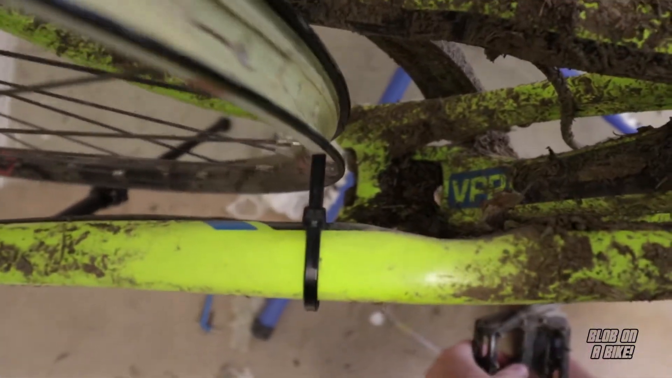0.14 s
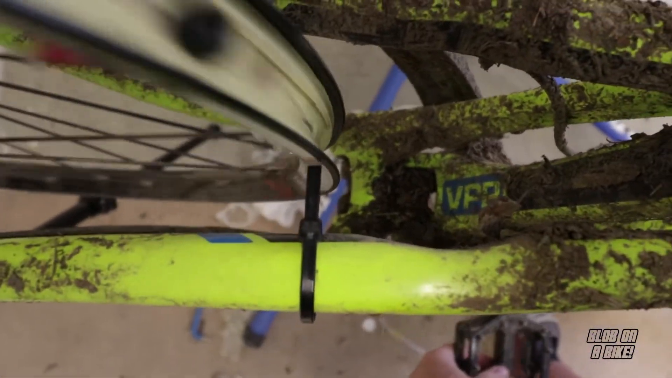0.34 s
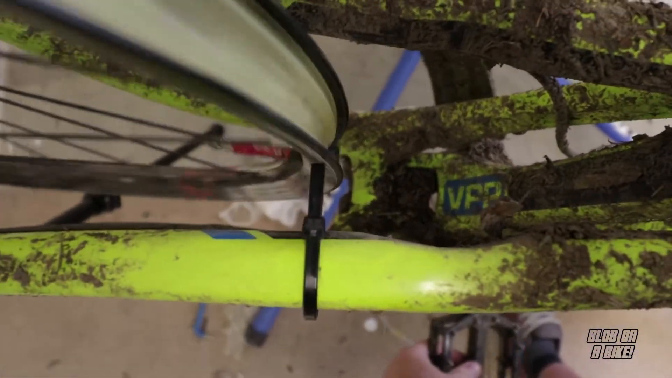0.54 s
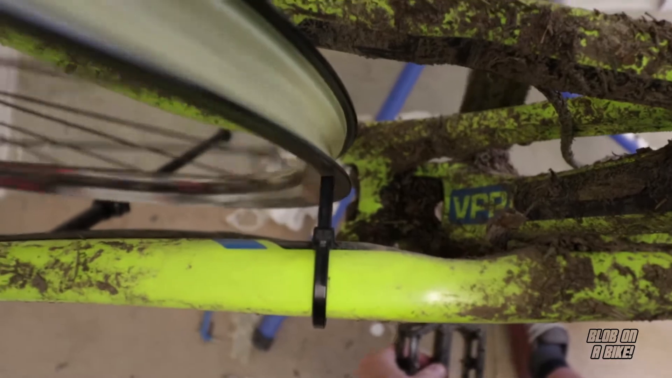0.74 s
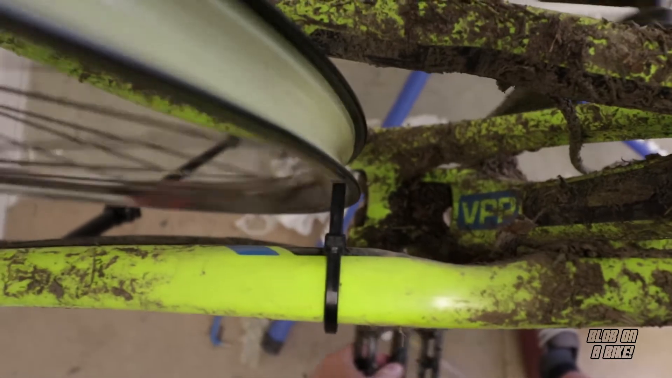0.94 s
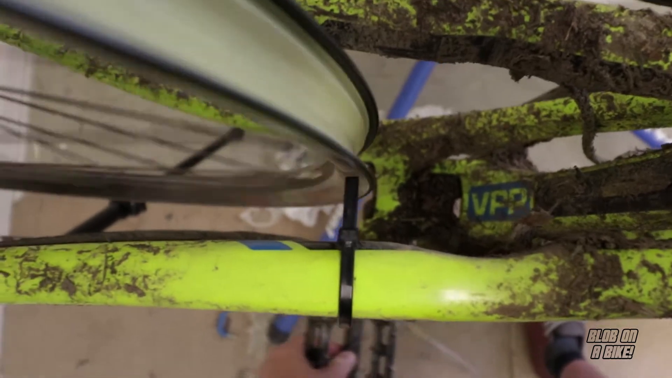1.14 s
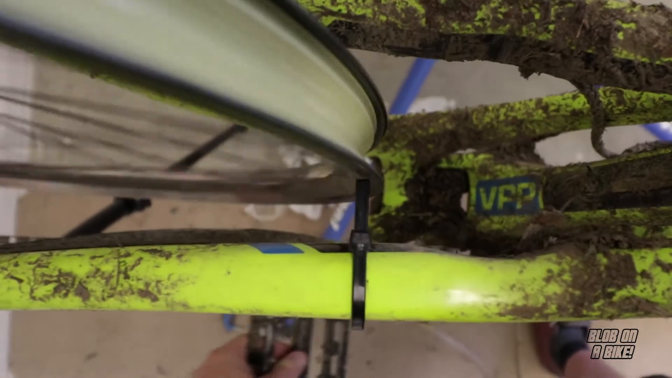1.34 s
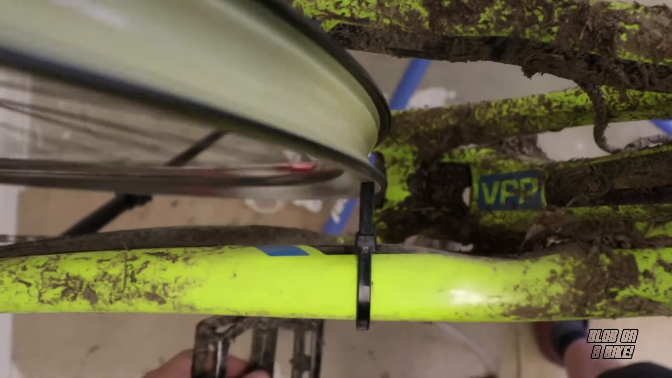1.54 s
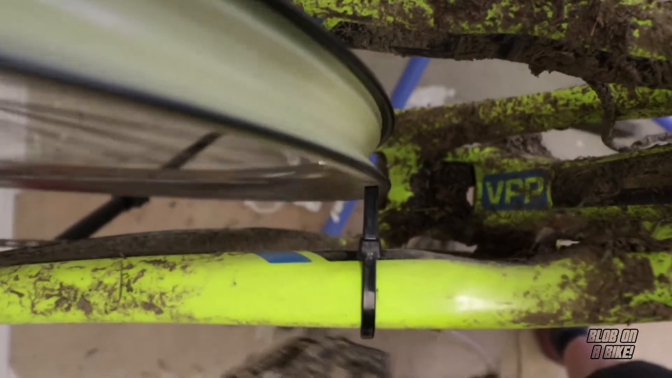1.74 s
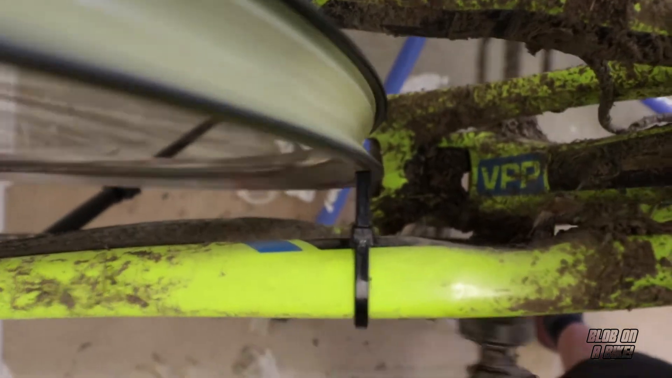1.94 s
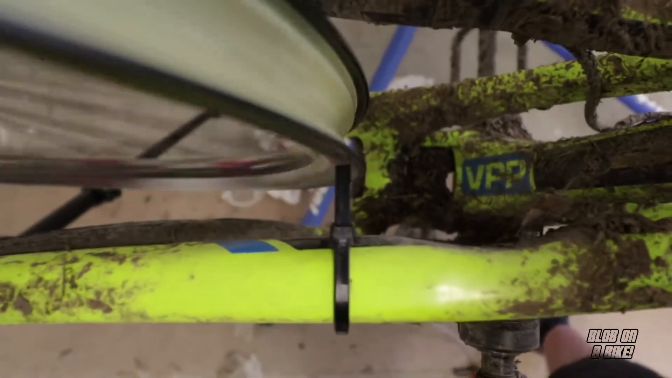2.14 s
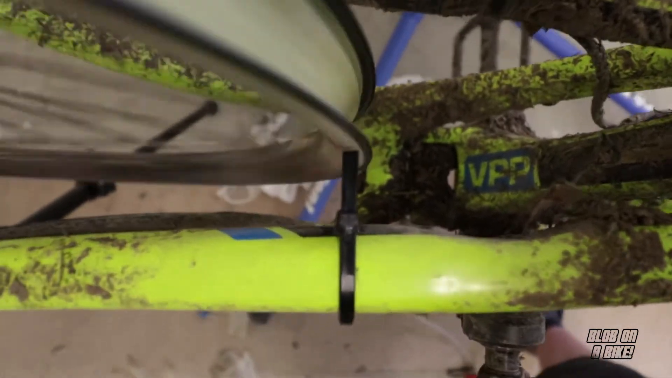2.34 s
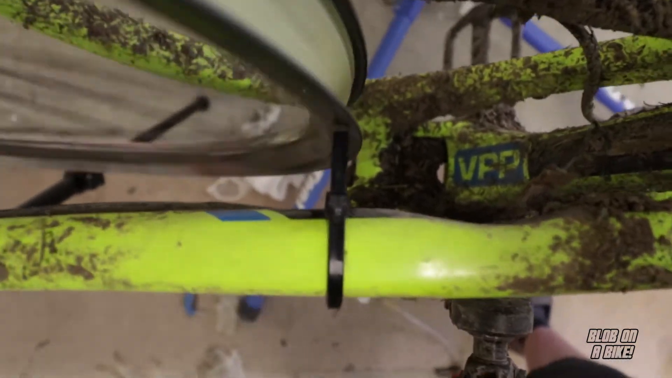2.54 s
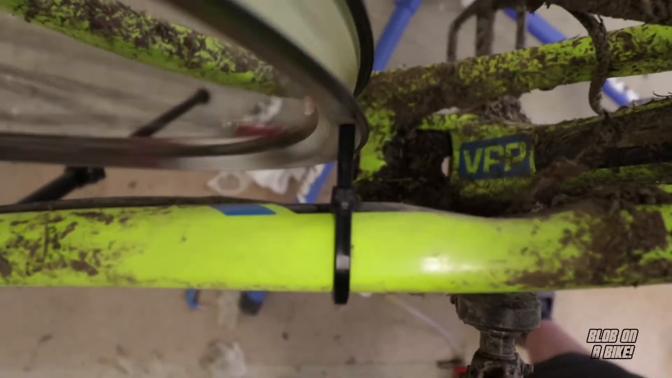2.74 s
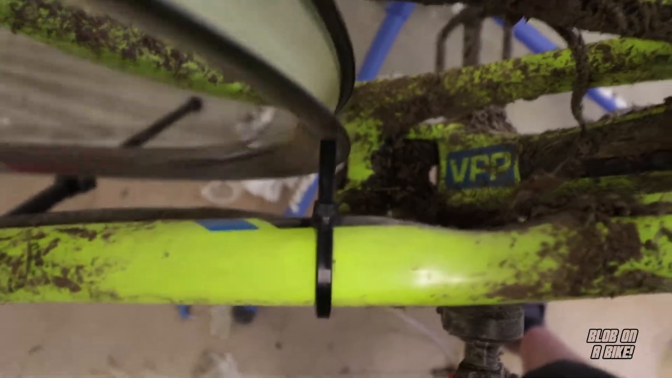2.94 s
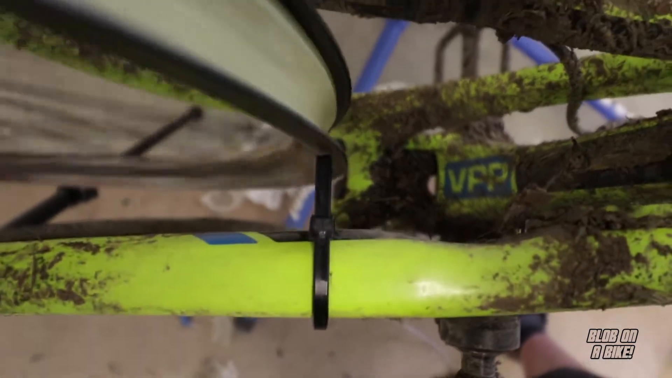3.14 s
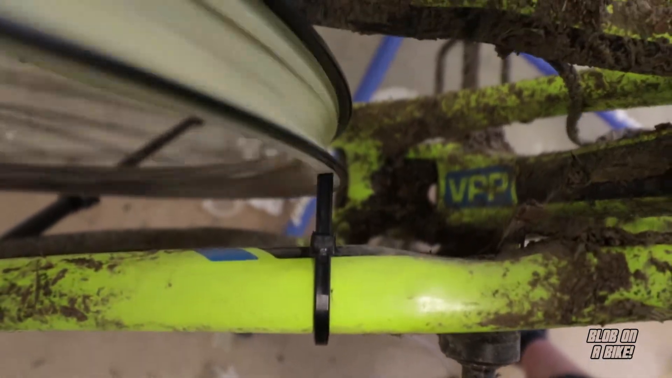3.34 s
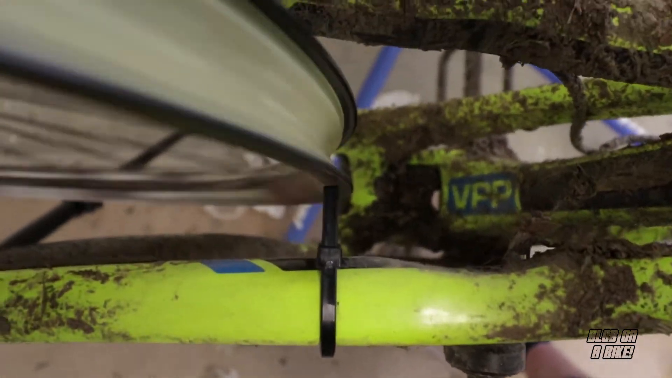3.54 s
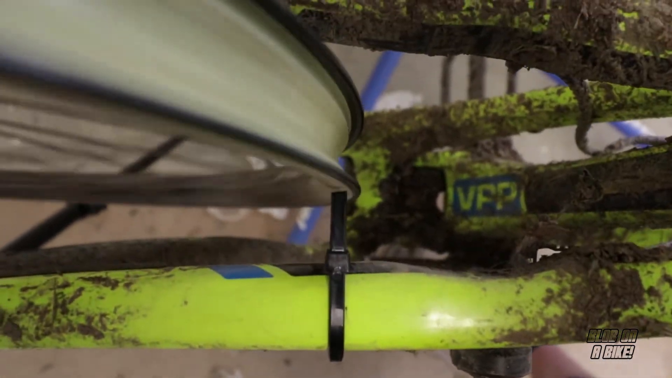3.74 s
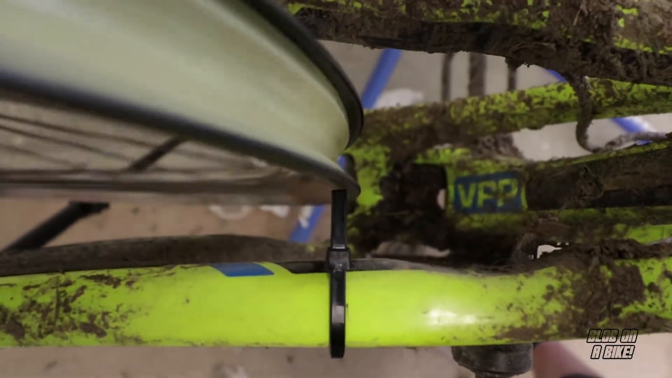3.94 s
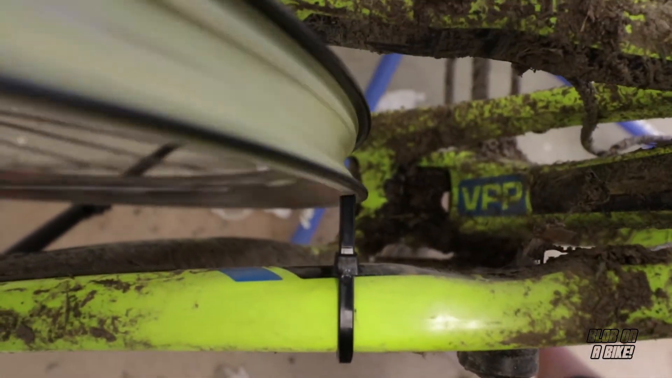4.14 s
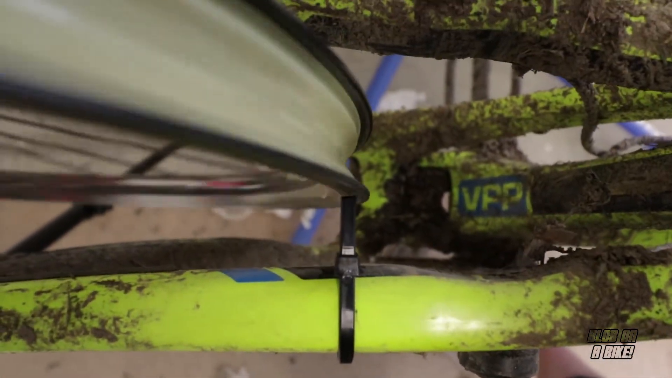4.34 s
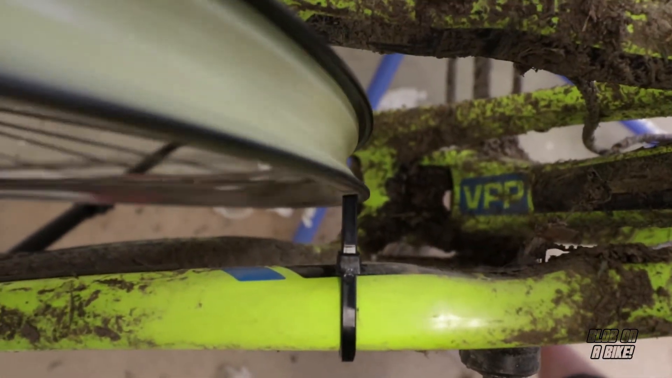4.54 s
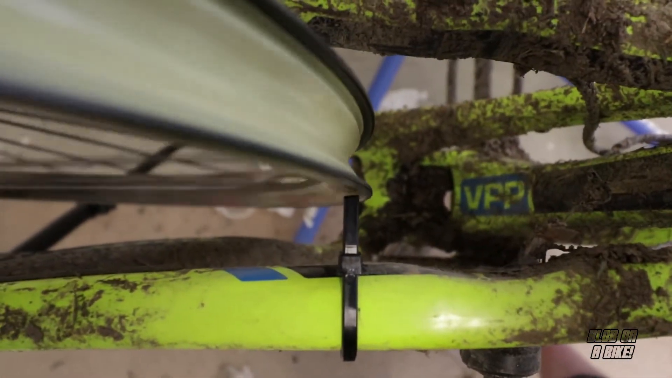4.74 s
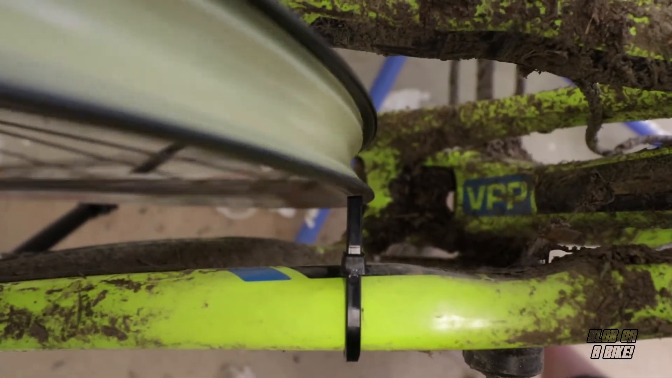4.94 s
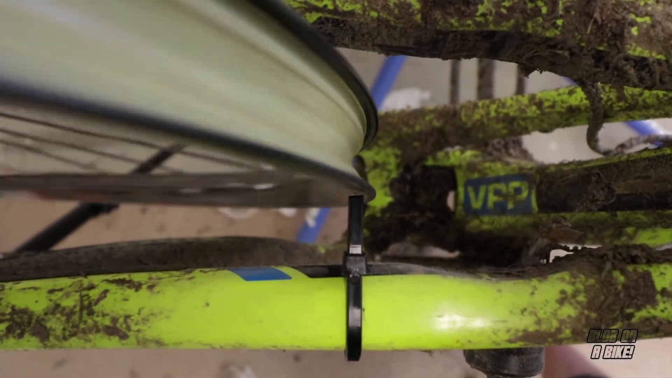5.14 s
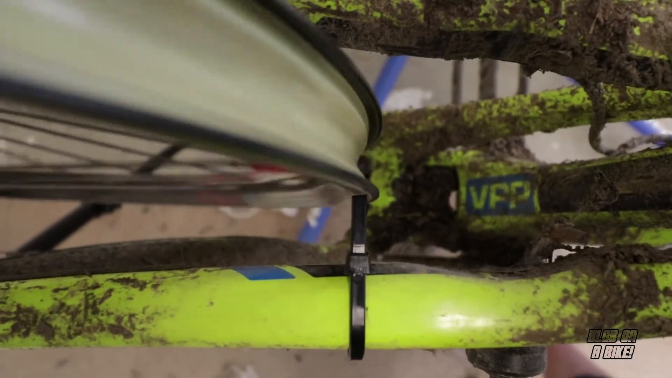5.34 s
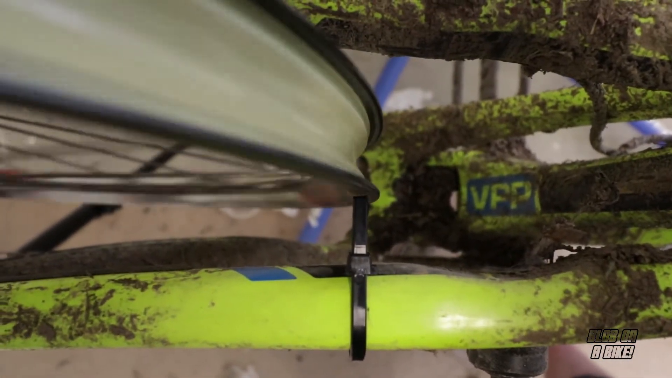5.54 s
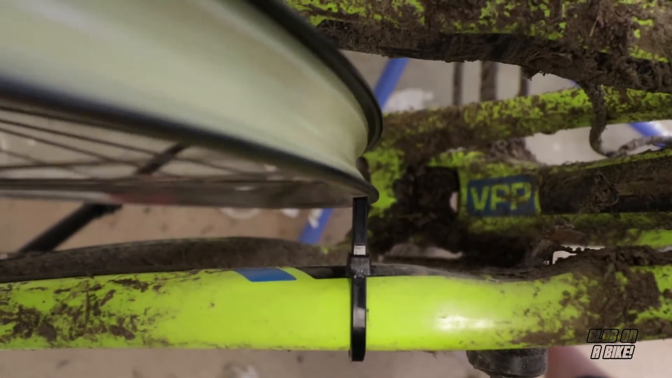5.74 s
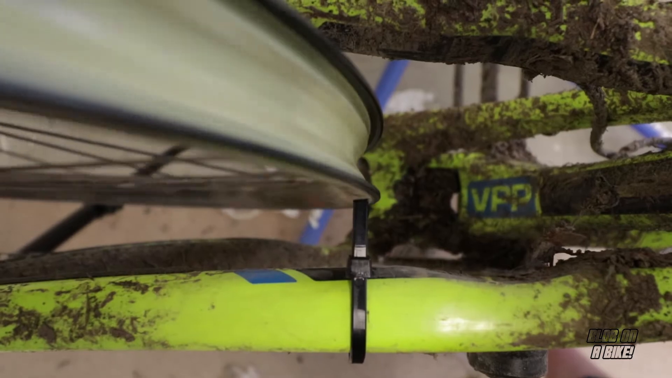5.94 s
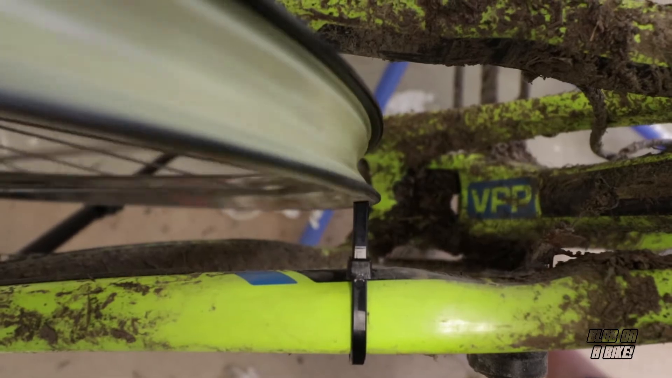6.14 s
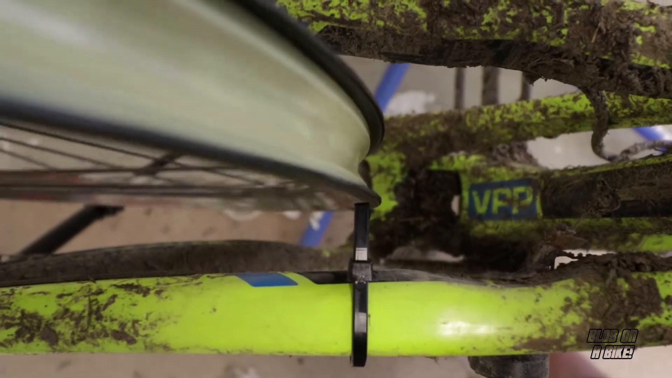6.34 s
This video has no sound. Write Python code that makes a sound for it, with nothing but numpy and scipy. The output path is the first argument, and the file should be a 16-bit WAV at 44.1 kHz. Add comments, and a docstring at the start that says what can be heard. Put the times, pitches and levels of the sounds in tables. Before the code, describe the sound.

Crank knocks and chain clinks, then a bicycle freewheel coasts with a loud bright ratchet buzz gradually slowing toward distinct clicks in a small workshop.

```python
"""A knock of a bicycle crank comes first, then more knocks, a few chain clinks and a soft chain rustle.
Then the crank is held and the wheel coasts on its stand: the freewheel pawls drop over the ratchet teeth,
a buzz that slowly thins into separate clicks. A motor hums in the small workshop throughout.
Knocks and clicks are sharp pushes or tiny noise bursts that make metal ring; the hum is a sum of sines.
It is heard in mono from beside the rear tyre."""
import sys
import numpy as np
from scipy import signal
from scipy.fft import rfft, irfft
from scipy.io import wavfile

SR = 44100
rng = np.random.default_rng(int(sys.argv[2]) if len(sys.argv) > 2 else 0)


def bounce(signal):
    """Save signal as a 16-bit WAV file at the path given by the first command-line argument."""
    frames = np.transpose(np.atleast_2d(signal))
    limited = np.clip(frames, -1, 1)
    pcm = np.round(limited * 32767).astype(np.int16)
    wavfile.write(sys.argv[1], SR, pcm)


N = 282240
TIME = np.arange(N) / SR
FREQ = np.maximum(np.fft.rfftfreq(16384, 1 / SR), 1)  # starts at 1 Hz so that logarithms work


def undb(db):
    """Turn decibels into a gain."""
    return 10 ** (np.asarray(db) / 20)


def unit(x):
    """Scale to an rms of 1."""
    return x / np.sqrt(np.mean(x ** 2))


def curve(rows, at):
    """Join rows of (x, value) by straight lines."""
    return np.interp(at, *np.transpose(rows))


def colour(points, freq=FREQ):
    """Gain curve through (frequency [Hz], level [dB]) points, straight on a log-frequency axis."""
    hz, db = np.transpose(points)
    return undb(np.interp(np.log(freq), np.log(hz), db))


def resonances(modes):
    """Gain curve with one peak for each (frequency [Hz], width [Hz], level [dB])."""
    power = 0
    for hz, width, db in modes:
        detuning = (FREQ ** 2 - hz ** 2) / (FREQ * width)
        power = power + undb(db) ** 2 / (1 + detuning ** 2)
    return np.sqrt(power)


def ring(x, gain):
    """Make a body with this gain curve ring: its response starts at the push and has unit energy."""
    # folding the cepstrum forward in time gives the minimum-phase response
    cepstrum = irfft(np.log(gain))
    half = len(cepstrum) // 2
    response = irfft(np.exp(rfft(2 * cepstrum[:half], 2 * half)))[:half]
    return signal.fftconvolve(x, response / np.linalg.norm(response))[:N]


def impulses(times, sizes):
    """One sharp push, a single sample long, at each time."""
    return np.bincount(np.maximum(times * SR, 0).astype(int), sizes, N)[:N]


def chatter(times, sizes, contact_s):
    """Each contact is a tiny, quickly dying noise burst of steel on steel."""
    decay = np.exp(-1 / (contact_s * SR))  # power kept from one sample to the next
    pushes = impulses(times, sizes ** 2) + 1e-18  # the tiny offset keeps the power above zero
    power = signal.lfilter([1 - decay], [1, -decay], pushes)
    return np.sqrt(power) * rng.standard_normal(N)


# How long the workshop's reverberation takes to fall by 60 dB: (frequency [Hz], decay time [s])
ROOM = [(200, 0.38), (2000, 0.49), (4500, 0.48), (9000, 0.3), (15000, 0.24)]


def tail(build_s=0.0033):
    """A random, diffuse echo of the workshop, of unit energy; each frequency dies at its own pace."""
    t = TIME[:SR // 2]
    spectrum = rfft(rng.standard_normal(len(t)))
    freq = np.fft.rfftfreq(len(t), 1 / SR)
    hz, decay_times = np.transpose(ROOM)
    echo = 0
    # overlapping bands share the spectrum between neighbouring frequencies of the table
    for band, decay_s in zip(np.eye(len(hz)), decay_times):
        echo = echo + irfft(spectrum * np.interp(freq, hz, band), len(t)) * undb(-60 * t / decay_s)
    echo = echo * (1 - np.exp(-(t / build_s) ** 2))  # the echo takes a moment to build up
    return echo / np.linalg.norm(echo)


def room(x, wet_db):
    """Add the workshop's reverberation to a source at rest."""
    return x + undb(wet_db) * signal.fftconvolve(x, tail())[:N]


def turning_room(x, angle, wet_db, count=3):
    """A turning source sweeps its lobes round the room, so the mix of echo paths keeps changing."""
    echoes = 0
    for k in range(1, count + 1):
        for wave in (np.cos, np.sin):
            echoes = echoes + signal.fftconvolve(x * wave(k * angle), tail())[:N]
    return x + undb(wet_db) * echoes / np.sqrt(count)


MOTOR_HZ = 30.44  # turns per second
# Hum of the motor: (multiple of the turning rate, rms level [dB])
HUM = [(3, -75), (4, -63.5), (5, -76.5), (8, -68), (9, -77), (10, -69.5), (12, -74.5), (13, -71), (14, -70),
       (15, -72.5), (29, -81.5), (32, -86), (35, -75), (36, -77), (38, -72), (39, -80), (40, -80),
       (41, -75), (42, -89), (47, -82), (53, -79.5)]
# Colour of the still air in the room: (frequency [Hz], relative level per Hz [dB])
AIR = [(25, -17), (42, -18), (60, -20), (80, -4), (118, -5.5), (176, -9.5), (300, -10.5), (420, -10),
       (600, -17.5), (850, -20), (1200, -18), (1650, -25), (1950, -32.5), (15000, -60)]


def workshop(air_db=-61):
    """A motor hums as steady sines at multiples of its turning rate, over the noise of still air."""
    hum = 0
    for k, db in HUM:
        turns = k * MOTOR_HZ * TIME + rng.random()
        hum = hum + undb(db) * np.sqrt(2) * np.sin(2 * np.pi * turns)
    return hum + undb(air_db) * ring(rng.standard_normal(N), colour(AIR))


# Soft low rubbing as the bike is handled: (time of the peak [s], length [s], centre [Hz], level [dB])
RUBS = [(1.65, 0.6, 185, -65), (5.25, 0.26, 232, -55)]


def rubs(width_hz=170):
    """Noise through one low, broad resonance swells and dies smoothly."""
    total = 0
    for s, length, hz, db in RUBS:
        swell = undb(db) * np.exp(-(2 * (TIME - s) / length) ** 2)
        # squaring makes the slopes steeper and the peak narrower
        total = total + swell * ring(rng.standard_normal(N), resonances([(hz, width_hz, 0)]) ** 2)
    return total


# The running chain, before the room is added: (time [s], level [dB])
CHAIN = [(.55, -84.5), (1.05, -72.5), (1.3, -74.5), (1.5, -66), (1.62, -74), (1.8, -67.5), (1.97, -72.5),
         (2.1, -90)]
# The chain settling on the sprockets: (time [s], level [dB])
CHAIN_CLINKS = [(.578, -42), (0.819, -37.5), (0.959, -28), (0.975, -34), (1.009, -30.5), (1.381, -37),
                (1.489, -36)]
# Colour of the oily links: (frequency [Hz], relative level [dB])
LINKS = [(300, -0.5), (600, -11), (1500, 0.5), (1950, -1), (2350, -4.5), (2850, 1), (3200, -2.5), (3750, 3),
         (4500, -7.5), (6000, -9.5), (8000, -13.5), (10500, -15), (15000, -19)]


def chain(count=2000, scatter_db=5.0, contact_s=.0016):
    """Many links tick faintly over the sprockets at random times, with a few clearer clinks."""
    end_s = CHAIN[-1][0]
    times = rng.uniform(0, end_s, count)
    sizes = unit(undb(scatter_db * rng.standard_normal(count)))
    # weigh the ticks so that the level does not depend on how many there are
    sizes = sizes * np.sqrt(end_s * SR / count)
    ticks = chatter(times, sizes * undb(curve(CHAIN, times)), contact_s)
    clink_times, clink_db = np.transpose(CHAIN_CLINKS)
    clinks = chatter(clink_times, undb(clink_db), contact_s=.003)
    return room(ring(ticks + clinks, colour(LINKS)), wet_db=-0.5)


# Knocks of crank and pedal: (time [s], level of the body [dB], metal tick relative to the body [dB])
KNOCKS = [(.008, -25.5, -13), (.11, -33, 15.5), (.703, -39, -10), (.736, -17.5, -19), (1.908, -24.5, -30)]
# What a knock's body rings with, before its colour: (frequency [Hz], width [Hz], level [dB])
KNOCK_MODES = [(606, 110, 0.5), (850, 260, -10), (1540, 250, -0.5), (2420, 120, 0.5), (3680, 92, -2)]
# What the metal tick rings with, before its colour: (frequency [Hz], width [Hz], level [dB])
TICK = [(1710, 260, -3.5), (2170, 210, 1.5), (2700, 300, -2), (3600, 280, 1), (4350, 700, -6),
        (10000, 3000, -40)]


def knocks():
    """Crank and pedal knock close by: each push makes a dull body and a metal tick ring."""
    times, db, tick_db = np.transpose(KNOCKS)
    body_colour = colour([(200, -10.5), (500, 22), (4000, 10), (12000, -18)])
    tick_colour = colour([(500, 3), (1600, -1), (11000, -10), (15000, -16)])
    body = ring(impulses(times, undb(db)), resonances(KNOCK_MODES) * body_colour)
    tick = ring(impulses(times, undb(db + tick_db)), resonances(TICK) * tick_colour)
    return room(body, wet_db=-11.5) + room(tick, wet_db=-10.5)


TEETH_PER_TURN, TOOTH_COUNT = 40, 195  # teeth on the ratchet, teeth that pass in all


def per_turn(tooth, peak_tooth, order=1):
    """A wave that repeats `order` times in each turn of the wheel."""
    return np.cos(2 * np.pi * order * (tooth - peak_tooth) / TEETH_PER_TURN)


# The crank stops [s]; the wheel's speed then, before the heavy spot's share [teeth/s]
RELEASE_S, START_TEETH_PER_S = 1.986, 70.4291
# Share of the wheel's speed the sprockets still have at release; teeth over which it falls to 1/e
SPROCKET_SHARE, SPROCKET_STOP_TEETH = .576252, 1.27163
# Steady friction [teeth/s squared] and air drag [share of speed lost per tooth] slow the wheel
FRICTION_TEETH_PER_S2, DRAG_PER_TOOTH = 10.79927, .0003554635
# Heavy spot: swing of the squared speed [(teeth/s) squared]; tooth where it hangs lowest, wheel fastest
UNBALANCE, HEAVY_TOOTH = 85.4617, 13.4378
# The ratchet is slightly out of round: (waves per turn, share of the tooth spacing, widest tooth)
OUT_OF_ROUND = [(2, .01795, 8.06), (3, .01365, .466)]


def coast(tooth):
    """When each tooth passes: the sprockets come to rest, friction and drag slow the unbalanced wheel."""
    friction = FRICTION_TEETH_PER_S2 / DRAG_PER_TOOTH
    # squared speed stands for the energy of motion
    energy = (START_TEETH_PER_S ** 2 + friction) * np.exp(-2 * DRAG_PER_TOOTH * tooth) - friction
    speed = np.sqrt(energy + UNBALANCE * per_turn(tooth, HEAVY_TOOTH))
    # the pawls only feel the wheel's speed relative to the sprockets
    rate = speed * (1 - SPROCKET_SHARE * np.exp(-tooth / SPROCKET_STOP_TEETH))
    spacing = 1
    for waves, share, widest in OUT_OF_ROUND:
        spacing = spacing + share * per_turn(tooth, widest, order=waves)
    gap = spacing / rate
    return RELEASE_S + np.cumsum(gap) - gap


# The pawls drop almost together: (lag [s], level [dB])
PAWLS = [(0, -1.5), (.0011, -10), (.0023, -0.5)]
# Reflections from floor, bench and walls: (delay, where the direct sound has 0.0011 [s], level re direct [dB])
REFLECTIONS = [(.0043, 6), (.0056, 3.5), (.0069, 3), (.0081, 4), (.0124, 5)]
# Broad colour of a pawl click: (frequency [Hz], relative level [dB])
CLICK = [(300, -44.5), (550, -18.5), (1100, -14.5), (1600, -8), (2000, -8.5), (2700, -1.5), (3600, -1.5),
         (4300, -2), (5500, -4), (7000, -4), (8200, -2), (11000, -2.5), (15500, -5)]
# Resonances of hub and sprockets: (frequency [Hz], width [Hz], level above the broad colour [dB])
HUB = [(1375, 60, 4), (1792, 90, 7), (2010, 40, 10), (2092, 35, 8), (2187, 35, 7), (2535, 53, 8),
       (2620, 35, 9), (2875, 130, 7.5), (3143, 28, 11), (3276, 22, 8), (3520, 110, 8), (3680, 104, 13.5),
       (3815, 85, 16.5), (3915, 90, 8), (4440, 90, 3), (4544, 25, 4), (4737, 20, 5), (5070, 50, 7),
       (5295, 22, 5), (5830, 94, 4), (7970, 220, 4), (8495, 143, 1), (9444, 200, 5), (10200, 97, 1),
       (11410, 80, 3)]


def pawl_clicks(times, size, lead_s=.0011, jitter_s=.0004, scatter_db=1.8, contact_s=0.00083,
                path_jitter_s=.0003):
    """The pawls land a little apart; the tyre screens the direct path, so the reflections are strong."""
    delay, path_db = np.transpose([(0.0011, 0)] + list(REFLECTIONS))
    path_gain = undb(path_db) / np.linalg.norm(undb(path_db))
    arrivals, blows = [], []
    for lag, db in PAWLS:
        late, force = rng.standard_normal((len(times), 2)).T
        # the paths shift as the hub turns
        shift = path_jitter_s * rng.standard_normal((len(times), len(delay)))
        landing = times - lead_s + lag + jitter_s * late
        arrivals.append(landing[:, None] + delay + shift)
        blows.append(np.outer(size * undb(db + scatter_db * force), path_gain))
    bursts = chatter(np.ravel(arrivals), np.ravel(blows), contact_s)
    return ring(bursts, colour(CLICK) * np.hypot(1, resonances(HUB)))


# The springs drop the pawls equally hard at any speed; only the first few drops are softer
DROP_DB, SOFT_START_DB, SOFT_START_TEETH = -1.82, -2, 2.1
# The drops swell twice a turn: depth each way [dB], a tooth at which they are hardest
DROP_SWELL_DB, HARD_TOOTH = 0.17, 12.2
# Low resonances of the wheel: (frequency [Hz], width [Hz], level before the curve is squared [dB])
WHEEL = [(597, 16, 2), (676, 66, -2), (838, 60, 1.5), (938, 140, -1.5), (1228, 58, 0), (1356, 40, -4.5),
         (1580, 17, -9), (1792, 59, 3), (2027, 234, 2.5)]


def freewheel(click_db=-6.5, ring_db=-14.0, floor_echo_s=.0056, floor_echo_db=1,
              wheel_db=-22, swell_db=2.5, loud_tooth=32, fade_db_per_s=-0.88):
    """Each tooth drops the pawls and strikes the hub; the low ring swells once a turn and fades with time."""
    tooth = np.arange(TOOTH_COUNT)
    times = coast(tooth)
    soft_start = SOFT_START_DB * np.exp(-tooth / SOFT_START_TEETH)
    size = undb(DROP_DB + soft_start + DROP_SWELL_DB * per_turn(tooth, HARD_TOOTH, order=2))
    # the main blow follows the drop size and comes back once off the floor
    echo_times = times + floor_echo_s + .0003 * rng.standard_normal(len(times))
    blows = impulses(times, size) + impulses(echo_times, size * undb(floor_echo_db))
    hub = undb(ring_db) * ring(blows, colour(CLICK) * resonances(HUB))
    swell = swell_db * per_turn(tooth, loud_tooth) + fade_db_per_s * (times - RELEASE_S)
    wheel = ring(impulses(times, size * undb(wheel_db + swell)), resonances(WHEEL) ** 2)
    clicks = undb(click_db) * pawl_clicks(times, size)
    angle = 2 * np.pi * np.interp(TIME, times, tooth) / TEETH_PER_TURN
    return turning_room(clicks + hub + wheel, angle, wet_db=0.57)


def scene():
    """All sources at one microphone, the same in both channels."""
    mono = workshop() + rubs() + chain() + knocks() + freewheel()
    return np.tile(mono, (2, 1))


def record(dry, top_hz=15800):
    """The recorder cuts steeply above its top frequency."""
    return signal.sosfilt(signal.ellip(12, .1, 80, top_hz, fs=SR, output="sos"), dry)


dry = scene()
out = record(dry)
bounce(out)
```